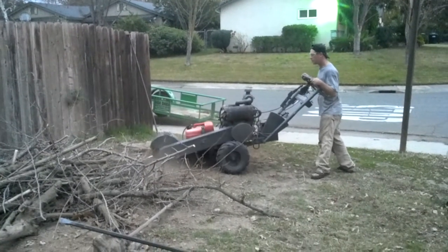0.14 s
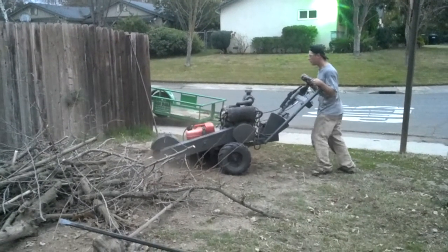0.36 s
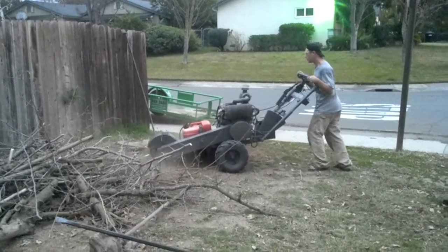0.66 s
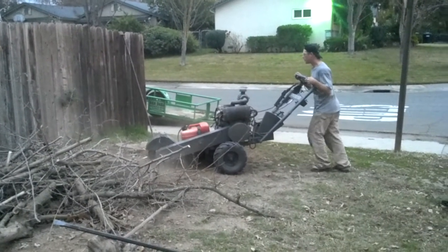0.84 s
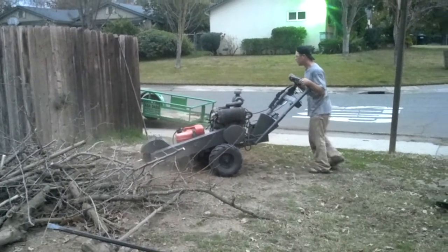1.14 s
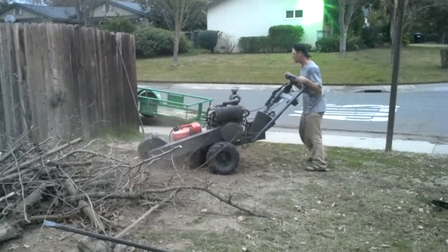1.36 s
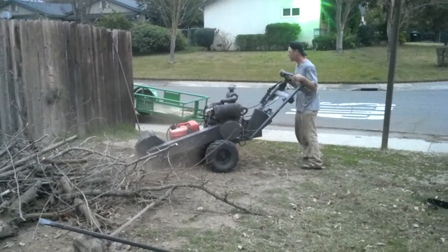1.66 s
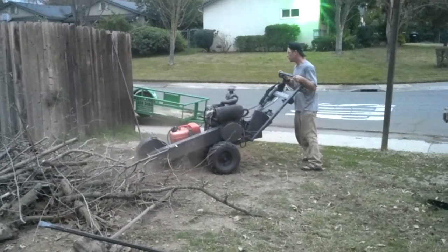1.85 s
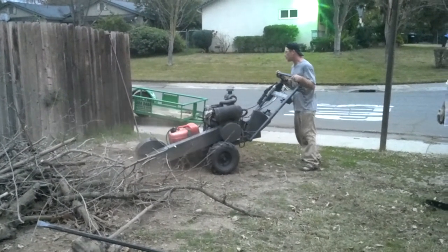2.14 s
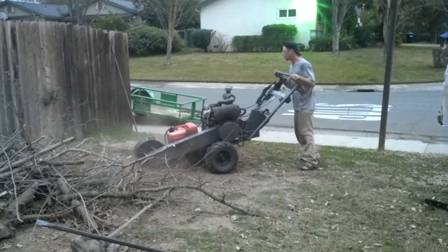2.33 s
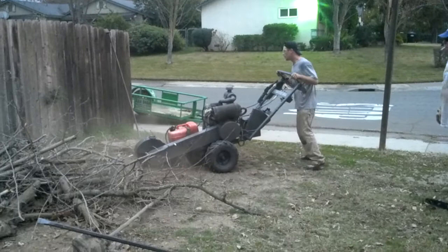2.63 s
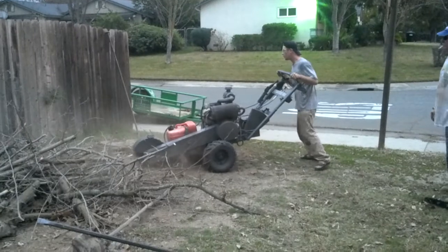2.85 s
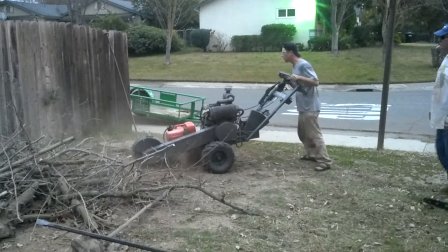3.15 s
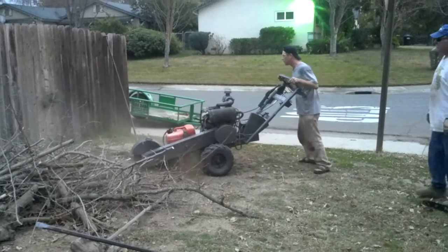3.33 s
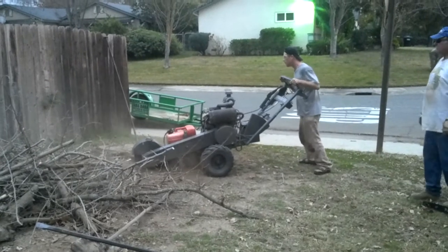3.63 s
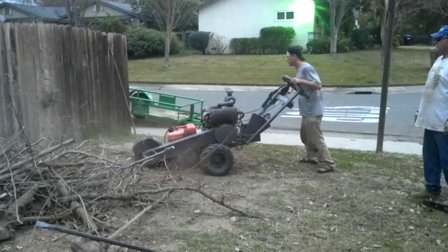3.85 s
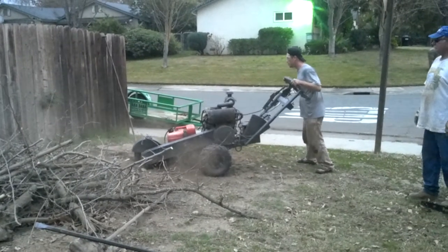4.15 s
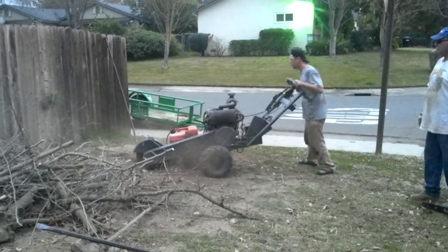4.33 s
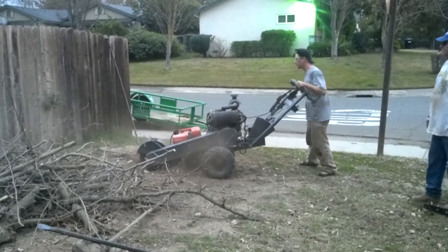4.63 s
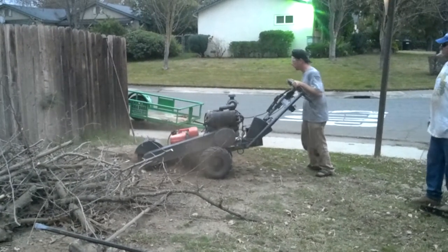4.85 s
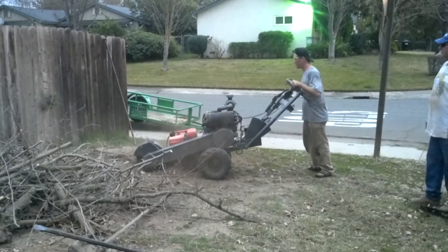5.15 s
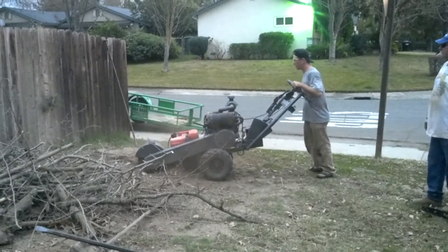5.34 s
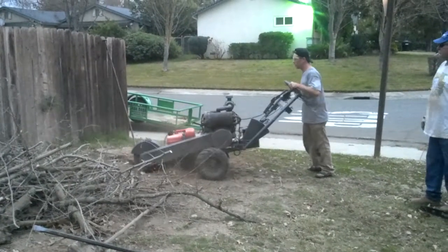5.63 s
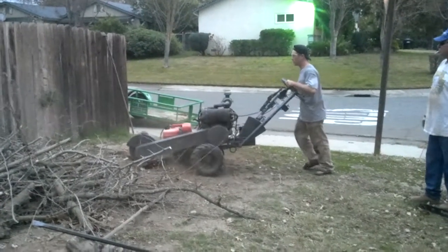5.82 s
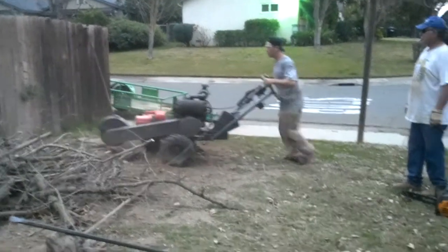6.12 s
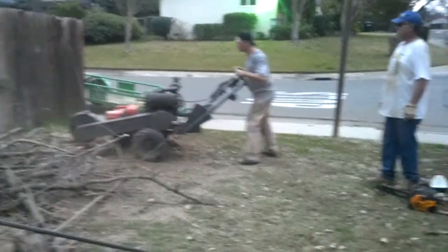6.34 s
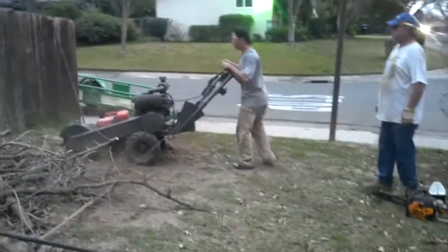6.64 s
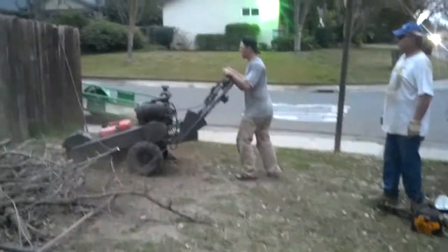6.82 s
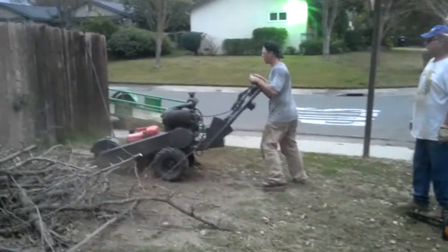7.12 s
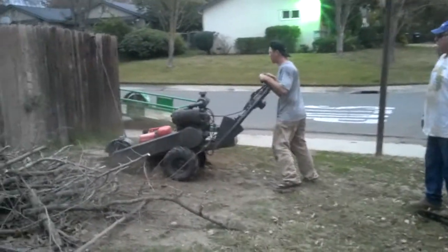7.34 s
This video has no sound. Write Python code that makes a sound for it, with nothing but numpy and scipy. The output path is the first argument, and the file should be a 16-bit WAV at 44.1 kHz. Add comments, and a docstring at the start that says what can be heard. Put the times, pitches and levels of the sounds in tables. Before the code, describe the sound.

A stump grinder fills the whole stretch: low engine throb, booming frame, steady wheel hum and coarse wood grinding. Bright metal rattles and belt-cover clatter ride on top, with fine spraying grit. Around five seconds the pitch dips, climbs to its highest after six, then falls through harsh skids before rising again. Outdoor yard, faint low air rumble, wide but coloured stereo pickup, no distinct room echo.

```python
"""A fenced yard, where a stump grinder works in front of a microphone with two ports.
A one-cylinder petrol engine throbs under a changing load (sines on multiples of its firing rate) and shakes
the frame; the toothed wheel chews wood (random blows through resonances), hums, chatters, skids and sprays chips.
Loose metal rattles in short showers of knocks, the belt cover clatters, and the open air rumbles faintly.
The ports are subtracted crosswise to aim left and right, which combs the sound."""
import sys
import numpy as np
from scipy import signal
from scipy.fft import rfft, irfft
from scipy.io import wavfile

SR = 44100
rng = np.random.default_rng(int(sys.argv[2]) if len(sys.argv) > 2 else 0)


def put_to_file(sound):
    """Save the sound as 16-bit audio at rate SR, in the file named by the first command-line argument."""
    columns = np.atleast_2d(sound).T  # one column per channel
    safe = np.clip(columns, -1, 1)
    whole_steps = np.round(safe * 32767)
    wavfile.write(sys.argv[1], SR, whole_steps.astype(np.int16))


N = 329868  # samples


def amp(db):
    """Gain of a level in dB."""
    return 10 ** (np.asarray(db) / 20)


def rms_one(x):
    """Scaled to rms 1."""
    return x / np.sqrt(np.mean(x ** 2) + 1e-20)


def in_time(rows):
    """Columns of a curve table, one value per sample."""
    s, *columns = np.transpose(rows)
    return [np.interp(np.arange(N) / SR, s, c) for c in columns]


def drift(rate):
    """Slow chance of spread 1: noise at every 40th sample through a double one-pole low-pass at rate [Hz]."""
    r = np.exp(-80 * np.pi * rate / SR)
    noise = rng.standard_normal(N // 40 + 2002)
    slow = signal.lfilter([1], [1, -2 * r, r * r], noise)[2000:]  # the filter has settled by then
    return np.interp(np.arange(N) / 40, np.arange(len(slow)), rms_one(slow))


def resonate(x, modes, flicker_db, flicker_rate):
    """Parallel resonances, each wavering in strength on its own; rms 1."""
    out = 0
    for k, (hz, width, db) in enumerate(modes):
        r = np.exp(-np.pi * width / SR)
        poles = [1, -2 * r * np.cos(2 * np.pi * hz / SR), r * r]
        band = signal.lfilter([1, 0, -1], poles, x) * (1 - r * r) / 2
        sign = (-1) ** k
        out = out + sign * amp(db + flicker_db * drift(flicker_rate)) * band
    return rms_one(out)


def grains(per_s, spread_db):
    """Random clicks of uneven size and sign."""
    sizes = amp(spread_db * np.minimum(rng.exponential(1, N), 5)) * rng.choice([-1, 1], N)
    return sizes * (rng.random(N) < per_s / SR) + 1e-18


def throb(turns, depth, sharp):
    """A gain that jumps once per cycle and sinks until the next."""
    return 1 + depth * np.exp(-sharp * (turns % 1))


def shower(s, db, t60, build_s):
    """Strength of a shower of knocks after each rattle: it builds quickly and dies away."""
    starts = np.zeros(N)
    starts[(s * SR).astype(int)] = amp(db)
    dying = signal.lfilter([1], [1, -amp(-60 / (t60 * SR))], starts + 1e-18)
    keep = np.exp(-1 / (build_s * SR))
    return signal.lfilter([1 - keep], [1, -keep], dying)


def rumble():
    """Faint low noise of the open air: white noise through one broad low resonance."""
    return amp(-39.0) * resonate(rng.standard_normal(N), [(40, 64, 0)], flicker_db=1.0, flicker_rate=3)


# belt cover resonance: (frequency [Hz], width [Hz], level [dB])
BELT_COVER = [(2420, 550, 0)]


def clatter(turns):
    """A burst of noise once a wheel turn rings the belt cover, through the same resonance twice."""
    burst = rng.standard_normal(N) * np.exp(-3.0 * (turns % 1)) * amp(2.0 * drift(8.8))
    ringing = resonate(burst, BELT_COVER, flicker_db=5.5, flicker_rate=8.1)
    return amp(-37) * resonate(ringing, BELT_COVER, flicker_db=7.5, flicker_rate=5.9)


# loose metal rattling: (time [s], relative level [dB])
RATTLE_TIMES = [(0.0507, -10.5), (0.0852, -18), (0.1835, -21), (0.3546, -13.5), (0.386, -16), (0.408, -15),
                (0.5023, -16), (0.573, -16.5), (0.6125, -17.5), (0.7208, -14), (0.751, -10), (0.8555, -25),
                (0.873, -13), (0.977, -12.5), (1.0071, -18), (1.039, -14.5), (1.1305, -15), (1.212, -15),
                (1.2456, -13), (1.26, -16), (1.3239, -20), (1.4296, -15.5), (1.546, -14.5), (1.605, -17),
                (1.6995, -13.5), (1.734, -14), (1.8592, -14.5), (1.8935, -12), (2.0434, -14.5),
                (2.0707, -14.5), (2.0951, -18), (2.1725, -14.5), (2.2013, -12), (2.313, -15), (2.411, -15),
                (2.4414, -13), (2.5436, -19), (2.6234, -21), (2.675, -21), (2.6928, -16), (2.752, -24),
                (2.7836, -17), (2.8709, -13.5), (2.955, -10.5), (3.0, -39), (3.061, -19.5), (3.0769, -18),
                (3.0964, -24), (3.1522, -23), (3.172, -19.5), (3.3832, -17), (3.4535, -12), (3.4835, -24),
                (3.5209, -13.5), (3.6995, -22), (3.81, -13), (3.872, -14.5), (3.943, -15.5), (4.0067, -13),
                (4.0956, -15.5), (4.1909, -22), (4.206, -11.5), (4.2333, -21), (4.268, -11.5),
                (4.3266, -20), (4.341, -15.5), (4.404, -15), (4.483, -17.5), (4.578, -18), (4.6583, -14),
                (4.691, -15), (4.718, -16.5), (4.79, -14), (4.9901, -18), (5.0789, -13.5), (5.1422, -15),
                (5.3153, -16), (5.3762, -17), (5.5293, -26), (5.5857, -19), (5.697, -13), (5.7818, -17.5),
                (5.8112, -27), (5.8516, -24), (5.8656, -14), (5.9306, -14), (5.9915, -16), (6.0911, -15),
                (6.198, -17), (6.2901, -21), (6.4138, -29), (6.5101, -20), (6.5306, -14.5), (6.5904, -22),
                (6.7595, -19), (6.782, -27), (6.859, -20), (6.9566, -19), (7.048, -15.5), (7.226, -16.5),
                (7.2918, -29), (7.3048, -14.5), (7.361, -15), (7.4649, -19)]
# ringing of the loose metal: (frequency [Hz], relative level [dB], decay by 60 dB [s])
LOOSE_METAL = [(3840, -14.5, .084), (4260, -16.5, .036), (4600, -13.5, .06), (4692, -13.5, .1),
               (5922, -9.5, .06), (6250, -4.5, .031), (6490, -5.5, .023), (6772, -1, .042),
               (6977, -1.5, .034), (7268, -1.5, .035), (7600, -6, .046), (9640, -13, .08),
               (10370, -19, .08), (10808, -16, .08), (11227, -17, .09), (11578, -26, .13),
               (13440, -32, .12)]


def rattles():
    """Each rattle is a short shower of knocks; every mode takes its own share of them."""
    s, db = np.transpose(RATTLE_TIMES)
    strength = shower(s, db - 1.5, t60=0.16, build_s=0.00027)
    first = shower(s, db, t60=0.026, build_s=0.0002)  # the first knocks are the hardest
    ringing = 0
    for hz, mode_db, t60 in LOOSE_METAL:
        r, w = amp(-60 / (t60 * SR)), 2 * np.pi * hz / SR
        restless = amp(-24.0 + 1.0 * drift(5.7))  # the parts never lie still
        knocks = (first + strength + restless) * grains(3500, spread_db=3.5)
        mode = signal.lfilter([0, np.sin(w)], [1, -2 * r * np.cos(w), r * r], knocks)
        ringing = ringing + amp(mode_db - 30.0) * mode

    crack_band = signal.butter(3, [5500, 8500], "band", fs=SR, output="sos")
    crack = signal.sosfilt(crack_band, strength * grains(12000, spread_db=3.0))

    sizzle_band = signal.butter(3, [8000, 12600], "band", fs=SR, output="sos")
    swell = shower(s, db, t60=0.053, build_s=0.0029) * amp(3.0 * drift(12.0))
    sizzle = signal.sosfilt(sizzle_band, swell * grains(10000, spread_db=6.5))
    return ringing + amp(-1.0) * crack + amp(-17.5) * sizzle


# hum at four times the wheel speed: (time [s], level [dB])
HUM_LEVEL = [(0, -14.5), (1.1, -15.5), (2.0, -18.5), (2.7, -24), (3.3, -20.5), (3.9, -28), (4.35, -20.5),
             (4.85, -31), (5.2, -20), (5.6, -25), (5.9, -17.5), (6.55, -18.5), (6.9, -23.5), (7.48, -23)]


def wheel_hum(turns):
    """Four groups of teeth beat the air once each per turn."""
    level_db = in_time(HUM_LEVEL)[0] + 1.2 * drift(2.4)
    return amp(level_db) * np.sin(8 * np.pi * turns + 0.059 * drift(21.0))


# wheel chatter, tooth rhythms ringing frame and guard:
# (start [s], end [s], multiple of the wheel speed, relative level [dB], roughness [0-1])
CHATTER_TONES = [(.2, 0.83, 6, -27, 0.3), (2.4, 2.75, 6, -21.5, 0.4), (2, 4.8, 6, -34, 0.8),
                 (5.9, 6.8, 6, -27, 0.15), (.9, 2.3, 7, -33, 0.4), (2.2, 2.6, 7, -30, 0.3),
                 (3.0, 4.15, 7, -20.5, 0.27), (4.8, 5.15, 7, -22, 0.1), (5.95, 6.72, 7, -26.5, 0.6),
                 (6.75, 7.15, 7, -21, 0), (0, 0.55, 8, -25.5, 0), (.9, 1.57, 8, -24.5, 0.1),
                 (2.5, 2.8, 8, -30, 0.3), (2.95, 4.04, 8, -25, 0), (4.3, 5.2, 8, -29, 0.24),
                 (5.15, 5.65, 8, -22.5, .15), (6.8, 7.4, 8, -25.5, 0.16), (0, 1.13, 9, -35, 0.5),
                 (2.6, 3.7, 9, -32, 0.2), (2.95, 4, 13, -38, 0.5), (.45, 1.35, 14, -32, 0.23),
                 (3.0, 3.65, 14, -40, .3), (.55, 0.9, 16, -44, 0.5), (4.55, 4.95, 16, -33, 0.4),
                 (1.62, 2.1, 17, -32, 0.08), (2.68, 2.98, 17, -27.5, 0.2), (1.0, 1.6, 15, -33, 0.3),
                 (3.8, 4.15, 17, -33, 0.2), (3.25, 3.62, 22, -30.5, .1), (3.08, 3.42, 23, -34, 0.1),
                 (5.55, 5.95, 9, -28.5, 0.7), (6.05, 6.3, 8, -23, .4), (2.0, 2.88, 26, -26, 0.14),
                 (2.35, 2.74, 26, -34, 0.2), (6.69, 6.83, 17, -30, 0.3), (6.84, 7.08, 32, -35, .2),
                 (2.56, 2.74, 34, -27.5, 0.45), (3.1, 3.35, 27, -37, 0.1), (4.45, 4.95, 26, -35, 0),
                 (2.2, 2.92, 29, -30, 0.5), (2.68, 2.88, 28, -30, 0.7), (3.45, 3.7, 24, -48, 0.5),
                 (6.0, 6.25, 20, -32.5, 0.6), (2.38, 2.58, 21, -40, 0.6), (.9, 1.85, 22, -37, 0),
                 (1.65, 2.05, 27, -35.5, .2), (3.25, 4.2, 28, -42, 0.2), (3.3, 3.62, 32, -36, 0.3),
                 (3.3, 3.7, 40, -32, .2), (4.5, 4.85, 40, -32, 0.3), (2.85, 3.3, 42, -42, .2),
                 (3.78, 4.05, 42, -34, 0.1)]


def chatter(turns):
    """Rough tones on multiples of the wheel speed swell and fade while the wheel chatters."""
    out = np.zeros(N)
    for start, end, order, db, rough in CHATTER_TONES:
        a, b = int(start * SR), int(end * SR)
        wobble = rough * (drift(5.6)[a:b] + 1j * drift(35)[a:b])
        phase = 2 * np.pi * order * turns[a:b]
        tone = np.real((1 - rough / 2 + wobble) * np.exp(1j * phase))
        out[a:b] += amp(db) * signal.windows.tukey(b - a, 0.6) * tone
    return out


# rasps as the wheel skids across the stump: (start [s], length [s], level [dB])
SKID_TIMES = [(6.523, 0.11, -22), (6.671, 0.27, -22), (7.292, 0.098, -24.5)]
# resonances of the rasp: (frequency [Hz], width [Hz], relative level [dB])
RASP_MODES = [(2200, 150, -20), (2440, 210, 6.5), (2900, 380, 1.5), (4520, 180, -8)]
SKID_ATTACK_S, SKID_RELEASE_S = 0.0073, 0.059


def skid(turns):
    """Rasping grains through resonances of their own: quick attack, hold, release."""
    t = np.arange(N) / SR
    gain = np.zeros(N)
    for start, length, db in SKID_TIMES:
        corners = [0, SKID_ATTACK_S, length, length + SKID_RELEASE_S]
        gain += amp(db) * np.interp(t - start, corners, [0, 1, 1, 0])
    rasp = grains(9000, spread_db=0.6) * throb(4 * turns, depth=0.87, sharp=2.7)
    return gain * resonate(rasp, RASP_MODES, flicker_db=0.5, flicker_rate=13.0)


# spectrum of chips and grit: (frequency [Hz], relative level per Hz [dB])
SPRAY_COLOUR = [(2500, -32), (3500, 10.5), (4500, 4.5), (6000, 3), (7500, 7.5), (9000, 4), (11000, -2.5),
                (12500, -40), (14000, -33), (14700, -38), (15300, -55)]


def spray(turns, bite_db):
    """Fine grit and chips, pulsing with the wheel and following the bite of the teeth."""
    grit = grains(12000, spread_db=3.5) * throb(turns, depth=0.83, sharp=2.6) * amp(1.84 * drift(6.8))
    hz = np.fft.rfftfreq(N, 1 / SR)
    at, db = np.transpose(SPRAY_COLOUR)
    colour = np.interp(np.log(hz + 1), np.log(at), db, left=-60)
    spray_db = -30.5 + bite_db - bite_db.mean()
    return amp(spray_db) * rms_one(irfft(rfft(grit) * amp(colour), N))


# frame resonances, shaken by the firing: (frequency [Hz], width [Hz], relative level [dB])
FRAME_MODES = [(162, 45, -1), (242, 121, 2.5), (322.4, 72, 7.5), (441.5, 63, -5.5)]


def frame(firings, shake_db):
    """Noise pushed by each firing sets the frame booming."""
    push = rng.standard_normal(N) * throb(firings, depth=0.26, sharp=1.6)
    boom = resonate(push, FRAME_MODES, flicker_db=0.0, flicker_rate=3.9)
    return amp(shake_db) * signal.sosfilt(signal.butter(4, 130, "high", fs=SR, output="sos"), boom)


# guard and stump, excited by the teeth: (frequency [Hz], width [Hz], relative level [dB])
GUARD_MODES = [(565.5, 106, -0.5), (653, 40, 5), (765, 131, -0.5), (879, 27, 3.5), (978, 167, -1.5),
               (1089, 63, 4), (1200, 190, -2), (1406, 13, 0.5), (1538, 110, -3.5), (1679, 29, 5.5),
               (1808, 245, 0), (2139, 116, 2.5), (2251, 140, 6.5), (2284, 161, 6.5), (2889, 112, -4)]


def ring_guard(blows, flicker_rate):
    """Resonances of guard and stump under the blows, at rms 1."""
    return resonate(blows, GUARD_MODES, flicker_db=2.0, flicker_rate=flicker_rate)


# teeth that stand proud: (place on the rim [turns], relative level [dB])
PROUD_TEETH = [(0.0, -0.5), (0.19, -2.5), (0.43, -3), (0.6, -4), (0.83, -5.5)]


def jolts(turns, bite_db):
    """Proud teeth strike in one pattern every turn, slightly uneven in time and strength, ringing the guard."""
    strikes, late = 1e-18, 0.003 * drift(8.0)  # late is in turns
    for place, db in PROUD_TEETH:
        whole = np.floor(turns - place + late)
        passing = np.diff(whole, prepend=whole[0]) > 0
        strikes = strikes + passing * amp(db + 1.8 * drift(4.2))
    return amp(bite_db - 9.0) * ring_guard(strikes, flicker_rate=1.84)


def teeth(turns, bite_db):
    """Dense tooth blows tear the wood and ring the guard."""
    blows = grains(9000, spread_db=3.0) * throb(turns, depth=0.14, sharp=0.33)
    return amp(bite_db - 0.5) * ring_guard(blows, flicker_rate=14.6)


# exhaust tones: (multiple of the firing rate, relative level [dB])
EXHAUST_ORDERS = [(3, -38.5), (4, -35.5), (5, -22.5), (6, -25), (7, -39), (8, -27.5), (9, -28), (10, -33.5),
                  (11, -44), (12, -31.5), (13, -36.5), (14, -43)]
# gain on all exhaust tones: (time [s], level [dB])
EXHAUST_LEVEL = [(0, -1), (1, -1.5), (2, -1.5), (3, 0), (4, -.5), (5, 0.5), (5.5, .5), (6.0, 1.5), (6.6, 1),
                 (6.9, -1), (7.48, -0.5)]


def exhaust(firings):
    """Low orders of the firing pulse; uneven combustion makes each waver, the higher the more."""
    out = 0
    for order, db in EXHAUST_ORDERS:
        waver = 0.013 * order * drift(22.0)
        phase = 2 * np.pi * order * firings + waver + rng.uniform(0, 2 * np.pi)
        out = out + amp(db + 0.075 * order * drift(0.73)) * np.sin(phase)
    return amp(in_time(EXHAUST_LEVEL)[0]) * out


def machine(firings, turns, shake_db, bite_db):
    """All the noisy sources at once; each call gives other fine detail, as heard along another path."""
    background = rumble() + clatter(turns) + rattles()
    cutting = skid(turns) + spray(turns, bite_db) + jolts(turns, bite_db) + teeth(turns, bite_db)
    return background + frame(firings, shake_db) + cutting


# second microphone port against the first: (frequency [Hz], level [dB], phase lag [rad], likeness [0-1])
SECOND_PORT = [(60, -2.1, .03, .995), (190, -3.3, .1, 1), (260, -2.6, .12, .99), (340, -.7, .19, .99),
               (420, 1.3, .39, .92), (480, .7, .5, .5), (600, -4.7, .49, .74), (780, -3, .32, .86),
               (1000, -1.8, .47, .8), (1300, -3, 1.3, .7), (1600, -5.4, 2.3, .6), (1950, -4.1, 2.1, .76),
               (2250, -1.8, 2.6, .67), (3000, -5.2, 6.2, .56), (3500, -1, 6.8, .1), (4600, 7, 8.9, .35),
               (5700, 2.4, 11.2, .43), (6000, 1.1, 12.5, .42), (7000, -1.3, 14.3, .56),
               (7300, -1.3, 15.3, .4), (8450, -2.6, 18.9, .15), (16000, -1.4, 34, .2)]


def ports(direct, scattered):
    """The second port hears the direct sound shaded and late, mixed with sound scattered by fence and ground."""
    hz = np.fft.rfftfreq(N, 1 / SR)
    at, db, lag, alike = np.transpose(SECOND_PORT)
    alike = np.clip(alike, 0, 1 - 1e-9)
    db, lag, alike = (np.interp(hz, at, c) for c in (db, lag, alike))
    mix = alike * np.exp(-1j * lag) * rfft(direct) + np.sqrt(1 - alike ** 2) * rfft(scattered)
    return np.array([direct, irfft(amp(db) * mix, N)])


# engine and wheel: (time [s], firing rate [1/s], wheel speed [turns/s])
SPEED_CURVE = [(0, 28.0, 45.9), (0.3, 28.09, 46.03), (0.6, 28.31, 46.5), (1.0, 28.47, 46.73),
               (1.15, 28.37, 46.49), (1.45, 27.38, 44.74), (1.7, 27.28, 44.45), (1.9, 27.06, 44.12),
               (2.1, 27.76, 45.7), (2.25, 28.15, 46.1), (2.62, 28.05, 46.1), (2.77, 27.6, 45.0),
               (2.95, 27.22, 44.53), (3.25, 27.14, 44.36), (3.6, 27.59, 45.12), (3.9, 27.78, 45.48),
               (4.25, 28.35, 46.45), (4.6, 28.05, 45.94), (4.9, 27.8, 45.36), (5.08, 26.67, 43.28),
               (5.2, 26.41, 42.76), (5.35, 26.74, 43.51), (5.65, 28.12, 46.0), (5.95, 29.32, 48.38),
               (6.25, 29.78, 49.21), (6.52, 29.73, 49.28), (6.62, 29.3, 48.7), (6.72, 27.4, 44.8),
               (6.8, 26.3, 43.3), (6.95, 26.04, 42.86), (7.1, 26.69, 43.85), (7.4, 28.25, 46.37),
               (7.48, 28.7, 47.1)]
# work: (time [s], frame shake [dB], bite of the teeth, relative [dB])
WORK_CURVE = [(0.0, -25, -22.5), (1.1, -22, -21), (2.0, -26.5, -23.5), (2.35, -24.5, -19.5),
              (2.8, -20.5, -19.5), (3.02, -27, -21.5), (3.12, -24, -19), (3.6, -21, -19),
              (4.02, -23.5, -20), (4.16, -24, -23.5), (4.58, -22, -20.5), (5.0, -22, -19.5),
              (5.15, -25, -21.5), (5.35, -23.5, -21), (5.77, -24.5, -21.5), (6.35, -20, -21.5),
              (6.69, -21.5, -19), (6.85, -25, -24), (7.0, -23.5, -24), (7.48, -27.5, -22.5)]


def scene():
    """Tones reach both ports alike before the port response; the noise has its own detail on each path."""
    firings, turns = np.cumsum(in_time(SPEED_CURVE), axis=1) / SR
    shake_db, bite_db = in_time(WORK_CURVE)
    tones = wheel_hum(turns) + chatter(turns) + exhaust(firings)
    direct = tones + machine(firings, turns, shake_db, bite_db)
    scattered = tones + machine(firings, turns, shake_db, bite_db)
    return ports(direct, scattered)


CROSS_LAG, CUTOFF_HZ = 17, 15300  # delay of the subtracted port [samples], top of the band [Hz]


def record(dry):
    """Peaks are rounded in each port; each channel is its port minus the other delayed; bass and top are cut."""
    rounded = 0.8 * np.tanh(dry / 0.8)
    late = np.pad(rounded[::-1], ((0, 0), (CROSS_LAG, 0)))[:, :N]
    aimed = signal.sosfilt(signal.butter(2, 60, "high", fs=SR, output="sos"), rounded - late)
    return signal.sosfilt(signal.ellip(10, .5, 70, CUTOFF_HZ, fs=SR, output="sos"), aimed)


dry = scene()
out = record(dry)
put_to_file(out)
```